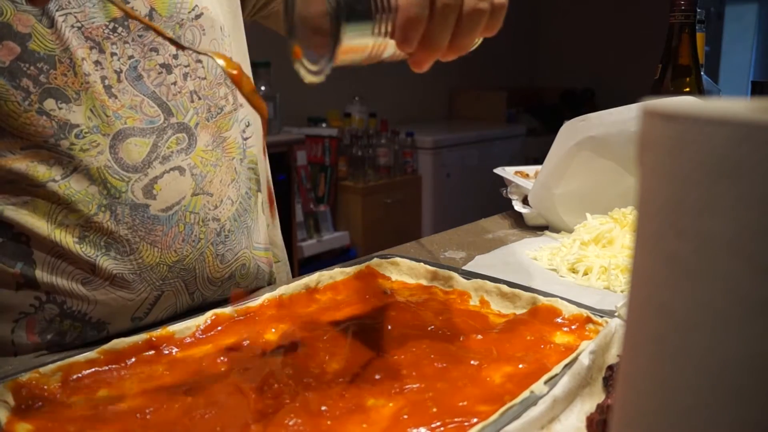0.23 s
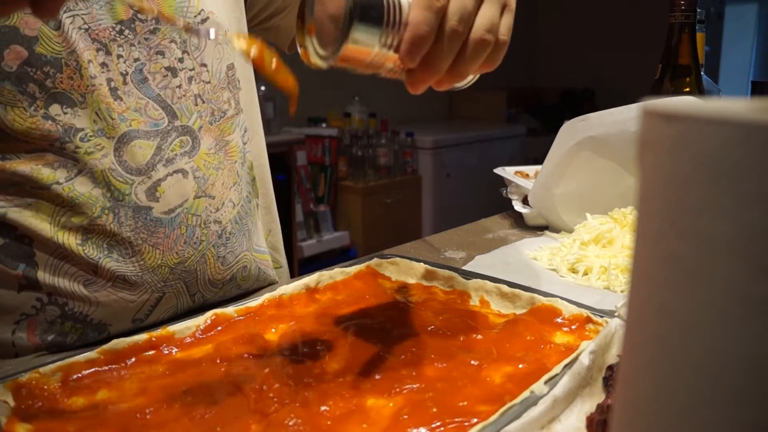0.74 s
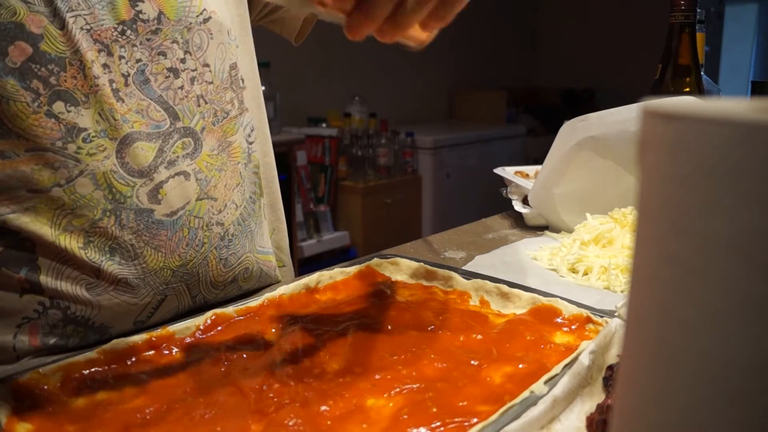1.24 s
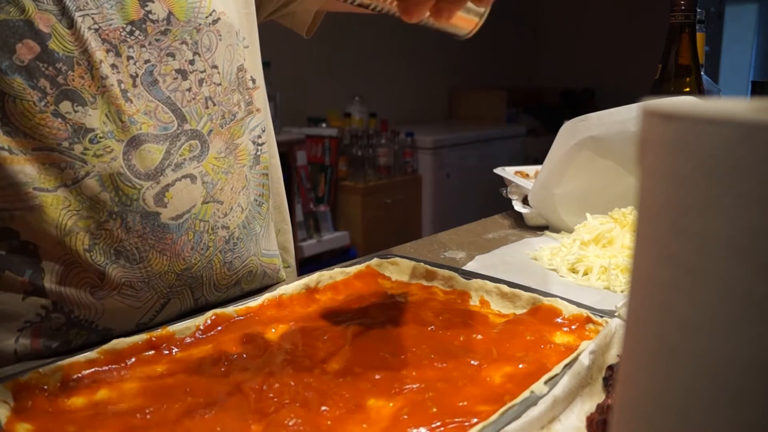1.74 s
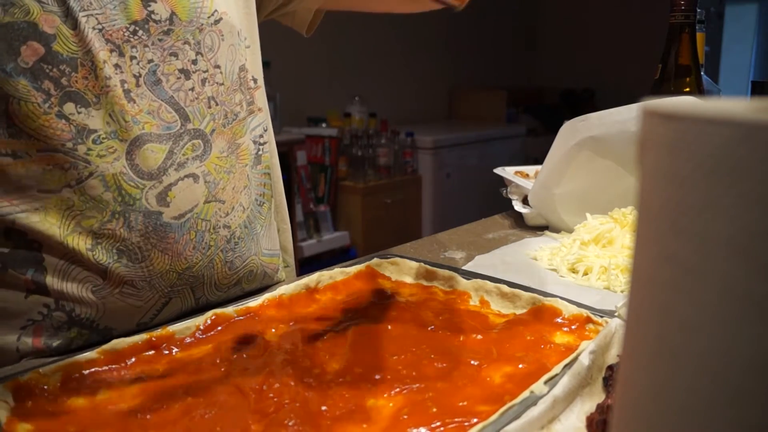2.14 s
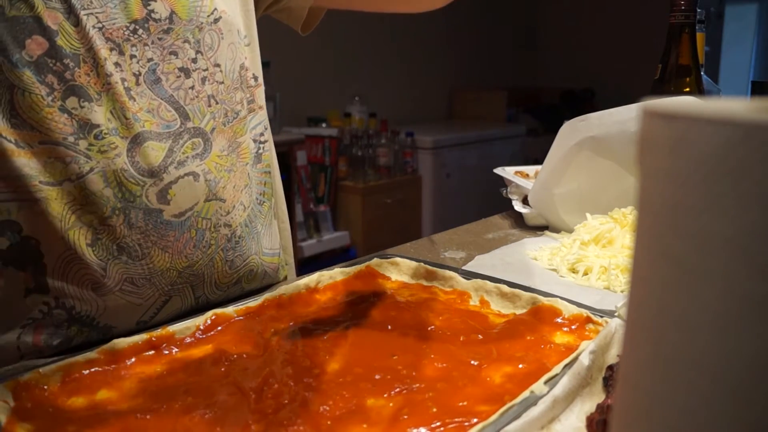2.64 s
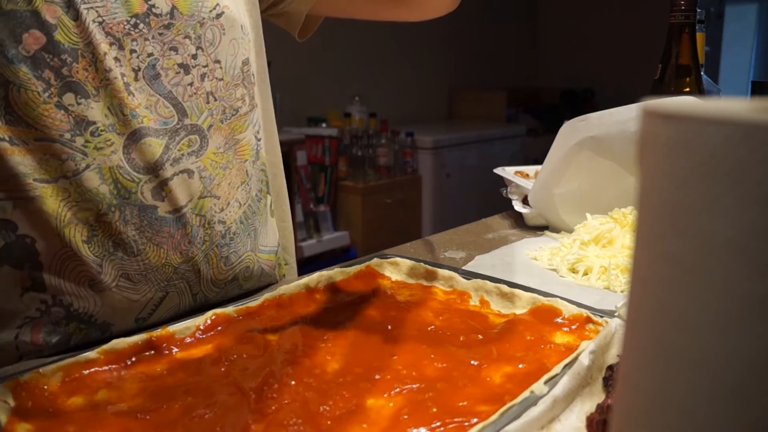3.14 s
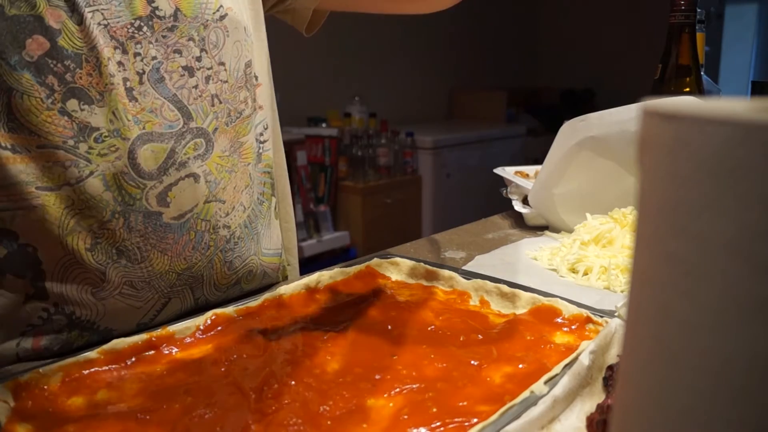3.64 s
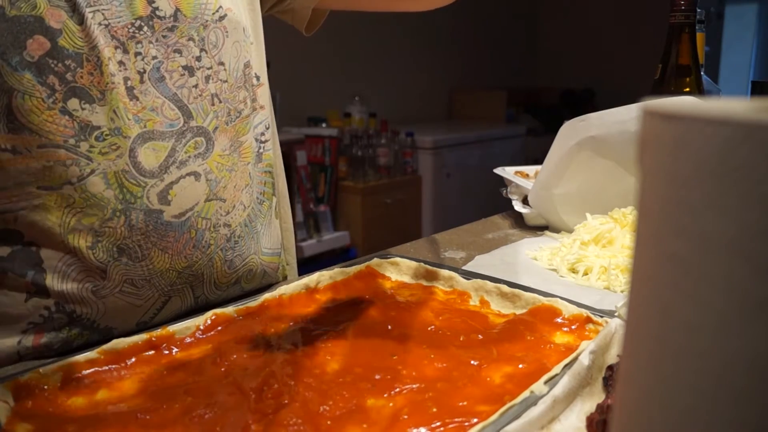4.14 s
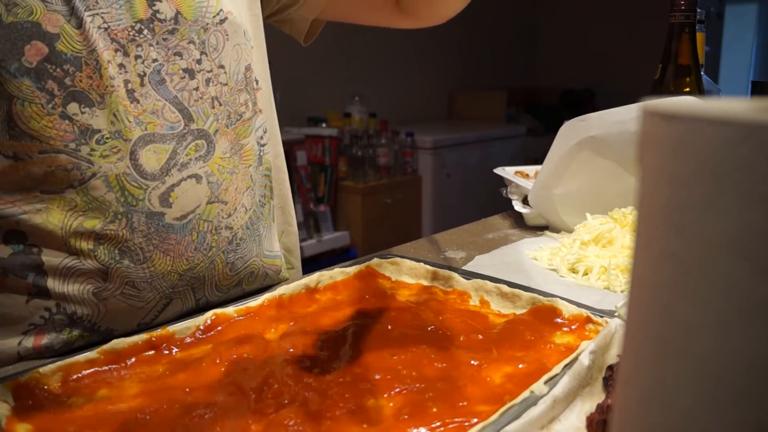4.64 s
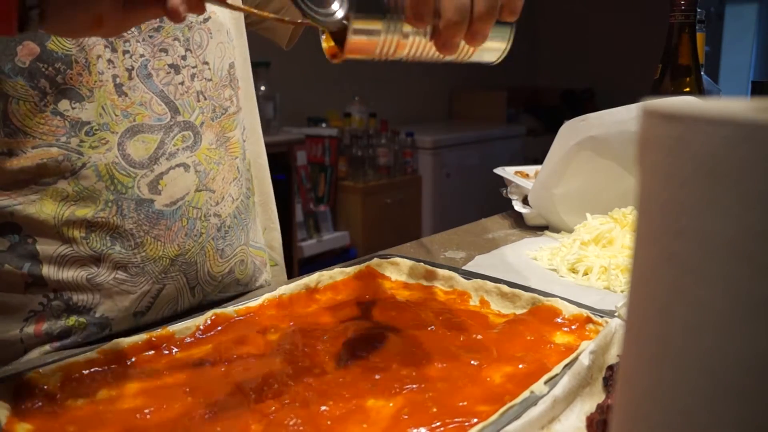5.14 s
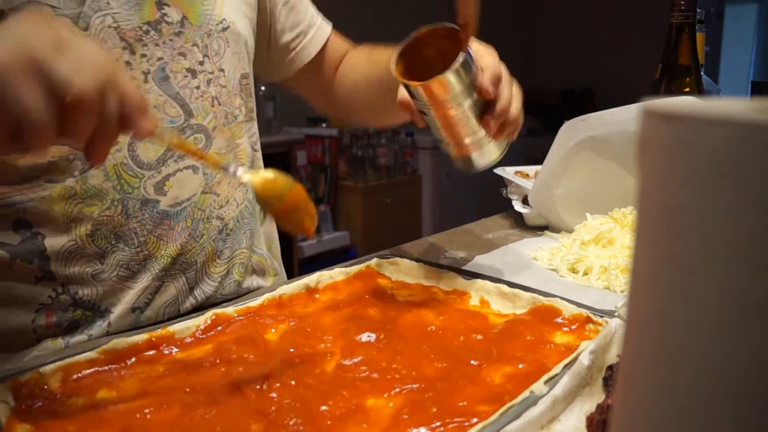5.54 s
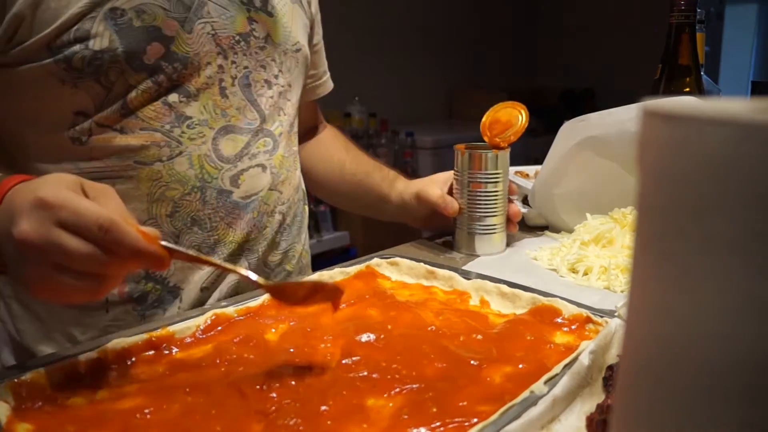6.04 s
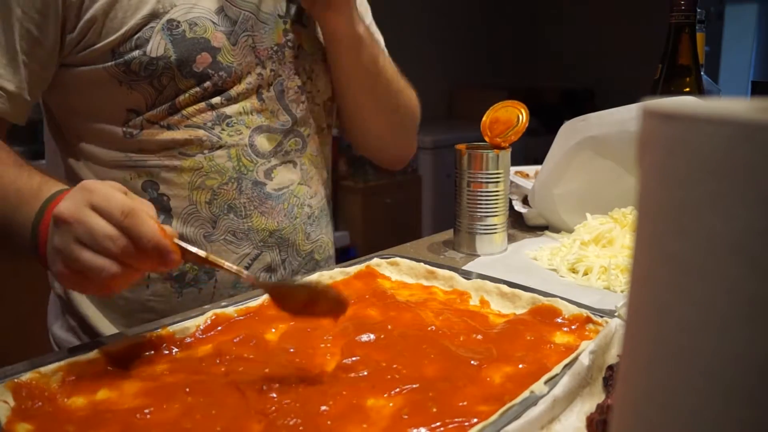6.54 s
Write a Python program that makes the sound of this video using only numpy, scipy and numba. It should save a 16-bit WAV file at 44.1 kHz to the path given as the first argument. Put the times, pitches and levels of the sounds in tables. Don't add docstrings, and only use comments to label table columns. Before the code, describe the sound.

Low refrigerator hum and airy room noise open the scene, with only faint touches of metal. Then a spoon strikes and rubs the inside of a thin tin: bright clicks, short hollow rings, gritty scrapes and quick ribbed rattles, busiest in the middle and sparser later. A hollow clunk and small rocking taps follow as the can is put down. Close stereo microphone, short lively kitchen echo.

```python
import sys
import numpy as np
from scipy import signal
from scipy.fft import rfft, irfft
from scipy.io import wavfile
from scipy.ndimage import uniform_filter1d
from numba import njit

SR = 44100
rng = np.random.default_rng(int(sys.argv[2]) if len(sys.argv) > 2 else 0)


def elevation(decibels):
    levels = np.asarray(decibels, float)
    return 10 ** (levels / 20)


def wav_record(signal):
    frames = np.transpose(np.atleast_2d(signal))
    bounded = np.clip(frames, -1, 1)
    quanta = np.round(bounded * 32767).astype(np.int16)
    wavfile.write(sys.argv[1], SR, quanta)


N = 299879

# [t/s, share of the free decay time, mouth pitch f/Hz]
CAN_STATE = [(0, .99, 756), (1.27, 0.93, 755.4), (1.56, 0.66, 728.6), (1.69, 0.52, 754), (2.07, 0.69, 757),
             (2.529, 0.43, 868), (2.631, 1.01, 773), (2.76, 0.43, 793), (3.04, 0.86, 788.6), (3.14, 0.71, 812),
             (3.529, 0.34, 772), (3.64, 0.75, 826), (3.759, 0.45, 804), (4.1, 0.47, 851), (4.235, 0.84, 819),
             (4.5, 0.61, 800), (5.1, 0.74, 791), (6.005, 0.79, 800.5)]
# [t/s, click level/dB, wall level/dB, mouth level/dB, spoon partial f/Hz]
KNOCKS = [(1.275, -12, -20.5, -21.5, 2340), (1.3249, -12, -45, -20, 4370), (1.3473, -11, -3.5, -12.5, 4220),
          (1.5634, -7, -9, -19.5, 4020), (1.5774, -11.5, -24, -17, 3040), (2.0739, -6.5, -19, -23.5, 3856),
          (2.4957, -18.5, -20.5, -22.5, 3580), (2.5323, -13, -10.5, -10, 2570),
          (2.6464, -14.5, -8.5, -51, 4070), (2.766, -11, -31, -30.5, 3860), (3.0435, -9.5, -10.5, -8, 4270),
          (3.1418, -9.5, -10.5, -8.5, 2960), (3.1794, -15, -16, -14, 3550), (3.2944, -20, -32, -24.5, 2360),
          (3.6456, -14, -17, -8.5, 3370), (3.7628, -5, -22.5, -15.5, 3760), (3.9702, -17, -40, -34, 3376),
          (4.103, -15.5, -11, -10.5, 3400), (4.1485, -13, -13.5, -14.5, 2900), (4.2375, -8, -17, -10, 3940),
          (4.5042, -17.5, -21, -22, 4060), (5.1098, -11.5, -41, -26, 4020), (5.249, -12, -26, -23.5, 4010),
          (5.3063, -23.5, -19, -47, 3180)]
RASP, DRONE, DULL, BRIGHT = range(4)


def per_sample(times, values):
    return np.interp(np.arange(N) / SR, times, values)


def held(times, values):
    latest = np.searchsorted(times, np.arange(N) / SR, side="right") - 1
    return values[np.clip(latest, 0, None)]


def spikes(times, sizes):
    return np.bincount((np.asarray(times) * SR).astype(int), sizes, N)


def band(x, lo_hz, hi_hz):
    edges_hz = [lo_hz, min(hi_hz, 0.45 * SR)]
    return signal.sosfilt(signal.butter(2, edges_hz, "band", fs=SR, output="sos"), x)


def walk(rate):
    k = int(SR / rate)
    stairs = np.repeat(rng.standard_normal(N // k + 1), k)
    return 2.3 * uniform_filter1d(uniform_filter1d(stairs, k), k)[:N]


@njit
def ring(x, hz, t60):
    out, z = np.empty(len(x), np.complex128), 0j
    for i in range(len(x)):
        z = z * np.exp((2j * np.pi * hz[i] - np.log(1000.) / t60[i]) / SR) + x[i]
        out[i] = z
    return out


def push(x, hz, t60, rise):
    ones = np.ones(len(x))
    contact = ring(x + 0j, hz * ones, rise * ones)
    return ring(contact, hz * ones, t60 * ones) * np.log(1000) / (rise * SR)


def ports(z, hz):
    lag = np.exp(1j * 0.27 * np.sqrt(hz / 2000) * rng.choice([-1, 1]))
    return np.array([(z * lag).imag * elevation(1.0), (z / lag).imag])


def lone(events, rise):
    length = SR // 2
    out, kick = np.zeros((2, N + SR)), np.eye(1, length)[0]
    for s, db, hz, t60 in events:
        start = int(s * SR)
        out[:, start:start + length] += ports(push(elevation(db) * kick, hz, t60, rise), hz)
    return out[:, :N]


def fridge(gain_db):
    # [f/Hz, level/dB]
    hum_lines = [(120, 0), (240, -7), (51, -19), (60, -20)]
    t = np.arange(N) / SR
    spread = np.array([[0.17], [-0.17]])
    waver = 0.5 * walk(6)
    hum = 0
    for hz, db in hum_lines:
        hum = hum + np.sqrt(2) * elevation(db + waver) * np.sin(2 * np.pi * hz * t + hz + spread)
    return elevation(-50 + gain_db) * hum


def room_noise(gain_db):
    # [f/Hz, level/dB per Hz]
    air_colour = [(25, -32), (45, -29), (85, -23.5), (150, -14.5), (240, -9), (420, -13.5), (900, -12.5),
                  (1250, -12), (1500, -17), (2500, -20), (3100, -28), (4600, -24), (7000, -34),
                  (15500, -52)]
    f, (colour_hz, colour_db) = np.fft.rfftfreq(N, 1 / SR), np.transpose(air_colour)
    colour = elevation(np.interp(np.log(f + 1), np.log(colour_hz), colour_db))
    air, swell = 0, walk(1.2)
    for hz in 30 * 2. ** np.arange(10):
        share = np.clip(1 - abs(np.log2((f + 1) / hz)), 0, 1) ** 0.5
        mid, side = irfft(rfft(rng.standard_normal((2, N))) * colour * share, N)
        breadth = min(0.17 + 6 / hz + hz / 7000, 0.9)
        flicker = elevation(0.18 * swell + 0.4 * walk(5.21))
        air = air + flicker * (mid + breadth * side * np.array([[1], [-1]]))
    return elevation(-42 + 0.68 * gain_db) * air / np.std(air)


def kitchen():
    # [t/s, level/dB]
    mic_gain = [(0, 1), (1.2, -0.6), (2, -1.5), (3, -5), (4, -5.5), (5, -6), (6.4, -5), (6.8, -6.5)]
    gain_db = per_sample(*np.transpose(mic_gain))
    return fridge(gain_db) + room_noise(gain_db)


def drag(layer):
    # [over the rasp in a scrape/dB, in a slide/dB, in a rattle/dB, lost at touch and lift/dB]
    layer_levels = [
        (0.15, 1.4, -.1, 11.5),
        (5.5, 10, 20, 14.5),
        (-3, 5, 17.5, 12),
        (0, -24, -8, 23),
    ]
    # [touch t/s, firm from t/s, firm until t/s, lift t/s, rasp level/dB]
    scrapes = [
        (.06, .11, .12, 0.16, -40.5),
        (1.5, 1.55, 1.718, 1.825, -34.5),
        (2.09, 2.18, 2.266, 2.264, -35),
        (2.3, 2.41, 2.43, 2.48, -36),
        (2.62, 2.645, 2.63, 2.64, -43),
        (3.14, 3.15, 3.17, 3.18, -27),
        (3.735, 3.76, 3.775, 3.92, -40.5),
        (4.44, 4.512, 4.76, 4.83, -40),
        (5.19, 5.24, 5.29, 5.34, -36),
    ]
    # [the same columns as the scrapes: t/s four times, level/dB]
    slides = [(1.35, 1.37, 1.44, 1.54, -42), (2.08, 2.09, 2.084, 2.12, -41.5),
              (2.59, 2.61, 2.815, 2.82, -43), (3.17, 3.22, 3.205, 3.4, -40.5),
              (3.65, 3.68, 3.65, 3.93, -44), (4.25, 4.27, 4.53, 4.35, -45), (5.115, 5.13, 5.17, 5.22, -53)]
    # [the same columns as the scrapes: t/s four times, level/dB]
    rattles = [
        (6.015, 6.04, 6.09, 6.22, -52),
    ]
    scrape_db, slide_db, rattle_db, lost_db = layer_levels[layer]
    gain = np.zeros(N)
    for rows, over_db in ((scrapes, scrape_db), (slides, slide_db), (rattles, rattle_db)):
        for *s, db in rows:
            s = np.sort(s)
            on = per_sample([s[0] - 0.01, s[0], s[3], s[3] + 0.01], [0, 1, 1, 0])
            gain += on * elevation(db + over_db - lost_db * per_sample(s, [1, 0, 0, 1]))
    return gain


def grit(rate):
    catches = (rng.random(N) < rate / SR) * rng.standard_normal(N)
    x = elevation(2.7 * walk(60)) * (catches + 0.085 * rng.standard_normal(N))
    return x / np.std(x)


def rustle():
    grain = 2.5 * walk(70)
    noise = elevation(grain) * rng.standard_normal((3, N))
    rub = 0.33 * grit(2300) + noise[0] + 1.28 * noise[1:]
    dull = drag(DULL) * band(rub, 1050, 1900)
    middle = drag(RASP) * band(rub, 1520, 5930)
    bright = drag(BRIGHT) * band(rub, 3530, 12600)
    return elevation(5.0) * dull + elevation(-1.0) * middle + elevation(-3.0) * bright


def blows():
    # [t/s, click level/dB, wall level/dB, mouth level/dB]
    ticks = [(.1017, -42, -27, -23), (.1251, -24, -25.5, -39), (1.5174, -34, -25, -28),
             (1.5444, -18.5, -39.5, -43), (1.6911, -13, -12, -25), (1.7054, -14, -9.5, -45),
             (1.7794, -39, -19, -27), (2.1694, -23, -24, -26), (2.2428, -33, -33, -39),
             (2.3511, -37, -42, -33.5), (2.4049, -17, -19.5, -25.5), (2.4748, -22, -46, -49),
             (2.6354, -16, -16, -11.5), (2.969, -27, -47, -50), (2.9791, -19.5, -36, -45),
             (3.0051, -21, -29.5, -46), (3.3413, -34, -40, -59), (3.5384, -16.5, -23, -27.5),
             (3.5987, -19.5, -27, -34), (3.6594, -17, -49, -22), (4.2694, -30, -21, -48),
             (4.4594, -33, -31, -40), (4.5446, -20, -16, -23), (4.572, -28, -16, -47),
             (4.7426, -18.5, -17.5, -44), (4.7691, -19, -16.5, -23.5), (5.2205, -24, -53, -41),
             (5.2305, -19.5, -47, -28), (5.2989, -17, -54, -43), (6.2487, -34.5, -38, -30.5)]
    # [first t/s, last t/s, click level/dB, wall level/dB, mouth level/dB]
    ribs = [
        (1.6132, 1.6556, -14, -12.5, -12),
        (2.445, 2.521, -27.5, -42, -30),
        (4.587, 4.6818, -19.5, -18.5, -25),
    ]
    # [t/s, wall level/dB]
    landing = [
        (6.0122, -7.5),
        (6.0494, -12),
        (6.0694, -16.5),
        (6.0894, -27),
        (6.1394, -26),
    ]
    over_db = -3
    hits = [(*hit[:4], over_db) for hit in KNOCKS + ticks]
    for first, last, *db in ribs:
        hits += [(s, *db, -8.5) for s in np.linspace(first, last, num=6)]
    hits += [(s, db - 30, db, db - 4, over_db) for s, db in landing]
    s, click_db, wall_db, mouth_db, over_db = np.transpose(sorted(hits))
    return s, click_db, wall_db, mouth_db, mouth_db + 0.32 * (click_db - mouth_db) + over_db


def modes(table, blow_db, rub, scatter_db, rise, shift, mouth=None):
    out, s = 0, blows()[0]
    free = held(*np.transpose(CAN_STATE)[:2])
    for hz, db, t60, *follow in table:
        luck = rng.standard_normal((len(s), 2)).T
        bend = held(s, 1 + shift * luck[1]) * (1 + 0.003 * walk(25))
        pitch = hz * (mouth ** follow[0] if follow else 1) * bend
        steady = np.sqrt(4 * np.log(1000) / (t60 * SR))
        struck = spikes(s, elevation(db + blow_db + scatter_db * luck[0]))
        force = struck + elevation(db) * steady * rub + 1e-18
        out = out + ports(push(force, pitch, t60 * free, rise), hz)
    return out


def can():
    # [f/Hz, level/dB, t60/s]
    wall_modes = [(608.5, -7.5, 0.35), (624, -31, 0.54), (648, -16, 0.33)]
    # [f/Hz, level/dB, t60/s, how closely it follows the mouth pitch (0-2)]
    mouth_modes = [(789, 1, 0.19, 0.965), (738.3, -8, 0.23, 1.194), (812, -23.5, 0.25, 0.39)]
    # [f/Hz, level/dB, t60/s, how closely it follows the mouth pitch (0-2)]
    overtones = [(1132, -2.5, 0.036, 0.068), (1773, -1, 0.087, 0.66), (1807.5, 0, 0.19, 0.34),
                 (1914, 5.5, 0.037, 0.18)]
    # [f/Hz, level/dB, t60/s]
    tin_modes = [(2281, -2, 0.04), (2560, -3, 0.05), (2780, -4, 0.045), (3050, -4, 0.05), (3290, -3, 0.065),
                 (3678, 2, 0.015), (4110, 5, 0.025), (4400, -4, .04), (4700, -3, 0.03), (5620, -6, 0.015),
                 (7230, -6, 0.01), (8340, -7, 0.008)]
    _, click_db, wall_db, mouth_db, over_db = blows()
    mouth = uniform_filter1d(held(*np.transpose(CAN_STATE)[::2]), size=90) / 790
    rub = grit(900)
    drone, rasp, dull = drag(DRONE) * rub, drag(RASP) * rub, drag(DULL) * rub
    wall = modes(wall_modes, wall_db, drone * elevation(4.5), scatter_db=2.3, rise=0.014, shift=0.0031)
    lip = modes(mouth_modes, mouth_db - 2.0, drone * elevation(-3.0), 0.28, 0.0099, 0.0052, mouth)
    over = modes(overtones, over_db - 8.0, dull * elevation(-8.0), 3.6, 0.012, 0.0098, mouth)
    tin = modes(tin_modes, click_db - 14, rasp * elevation(-8.5), scatter_db=3, rise=0.0033, shift=0.025)
    return wall + lip + over + elevation(1.5) * tin


def clicks():
    s, click_db = blows()[:2]
    t, hits = np.arange(2000) / SR, spikes(s, elevation(click_db - 7.5))
    noise = rng.standard_normal((3, N))
    noise = noise[0] + 0.88 * noise[1:]
    snap = signal.fftconvolve(hits, np.exp(-t / 0.0013))[:N] * noise
    clatter = signal.fftconvolve(hits, np.exp(-t / 0.008))[:N] * noise
    sparkle = snap * elevation(held(s, 0.5 * (click_db + 7)))
    crack = elevation(1.0) * band(snap, 1870, 10360) + elevation(-4.5) * band(sparkle, 9700, 14300)
    return crack + elevation(-5.5) * band(clatter, 1200, 8830) + elevation(-9) * band(clatter, 3400, 4400)


def thumps():
    # [t/s, level/dB, f/Hz, t60/s]
    thump_events = [(.35, -42, 125, 0.083), (.53, -40, 330, 0.087), (1.277, -25.5, 352, 0.03),
                    (1.33, -36, 300, 0.043), (2.405, -29.5, 423, 0.069), (2.44, -38, 326, 0.089),
                    (3.765, -32, 402, 0.048), (4.46, -40, 232, 0.07), (5.185, -45, 90, .08),
                    (6.012, -19, 404, 0.021), (6.014, -30, 311, 0.13), (6.014, -45, 110, 0.098)]
    return lone(thump_events, rise=0.0053)


def spoon():
    partials = [(s, db - 3.5, hz, 0.045) for s, db, _, _, hz in KNOCKS]
    return elevation(-7) * lone(partials, rise=0.00067)


def rim():
    # [t/s, level/dB, f/Hz, t60/s]
    rim_events = [(1.277, -16, 5170, 0.023), (1.275, -9, 8000, 0.017), (1.349, -19, 1252, 0.35),
                  (2.074, -25, 3850, 0.046), (2.075, -16, 1200, 0.039), (2.532, -20, 1650, 0.22),
                  (2.653, -21.5, 1285, 0.53), (3.649, -19, 3040, 0.13), (3.789, -15.5, 1200, 0.051),
                  (4.103, -15, 6820, 0.039), (4.149, -20.5, 4470, 0.093), (4.239, -22, 1364, 0.25),
                  (4.241, -23, 2554, 0.3), (5.111, -25, 2190, 0.11), (5.1105, -4.5, 4170, 0.021),
                  (3.647, -17, 3330, 0.077), (4.104, -20, 3340, 0.12), (6.012, -24, 4250, 0.017),
                  (6.012, -22, 2550, 0.026)]
    return elevation(-7) * lone(rim_events, rise=0.00067)


def room(x):
    # [low f/Hz, high f/Hz, level/dB, t60/s]
    echo_bands = [(201, 1540, -6, 0.61), (1200, 2740, -3.5, 0.52), (3700, 5850, -4.5, 0.56),
                  (8000, 10900, -8.5, 0.5)]
    t, noise = np.arange(SR) / SR, rng.standard_normal((3, SR))
    onset = np.clip(t / 0.0057 - 1, 0, 1)
    spread = (noise[0] + 0.77 * noise[1:]) * onset
    tail = 0
    for lo_hz, hi_hz, db, t60 in echo_bands:
        tail = tail + elevation(db - 60 * t / t60) * band(spread, lo_hz, hi_hz) / np.sqrt(t60 * SR / 14)
    return signal.fftconvolve(x[None], tail, axes=1)[:, :N]


def scene():
    small = signal.butter(3, 400, "high", fs=SR, output="sos")
    ringing = signal.sosfilt(small, can() + spoon() + rim())
    near = ringing + clicks() + rustle() + thumps()
    return near + room(near.mean(axis=0)) + kitchen()


def band_limit(x):
    return signal.sosfilt(signal.butter(12, 16640, fs=SR, output="sos"), x)


def record(dry):
    limited = np.tanh(1.139 * dry) / 1.174
    rolloff = signal.ellip(8, 0.3, 60, 15900, fs=SR, output="sos")
    return band_limit(signal.sosfilt(rolloff, limited))


dry = scene()
out = record(dry)
wav_record(out)
```